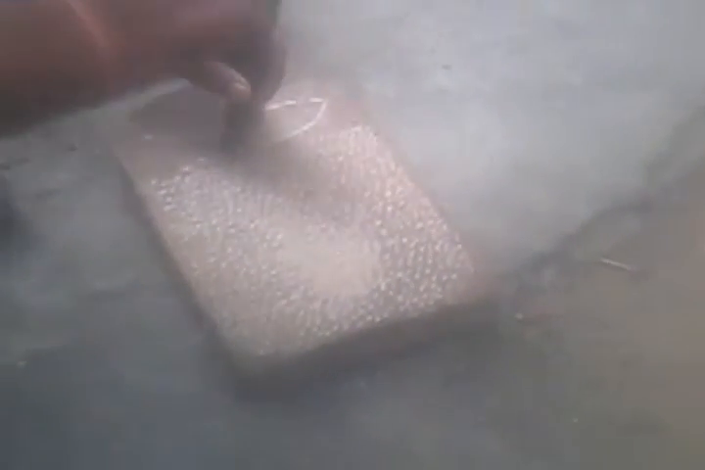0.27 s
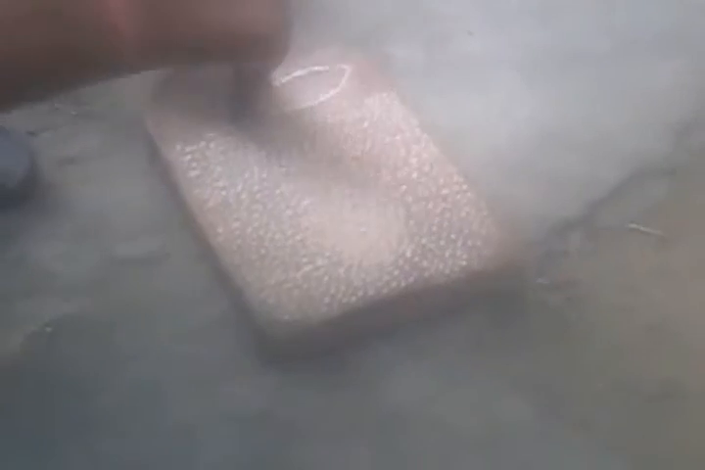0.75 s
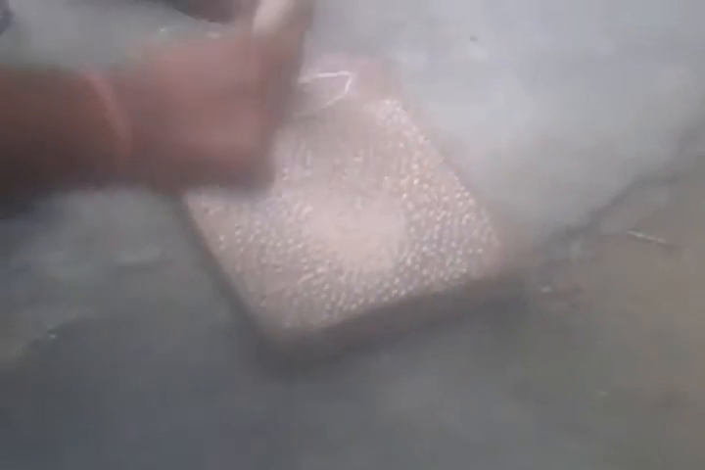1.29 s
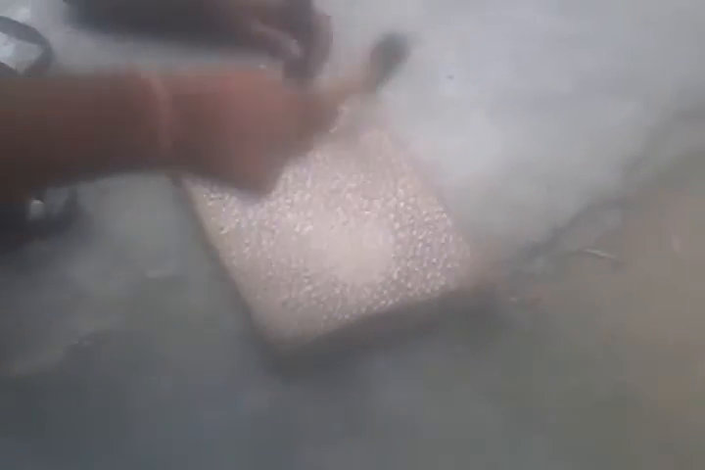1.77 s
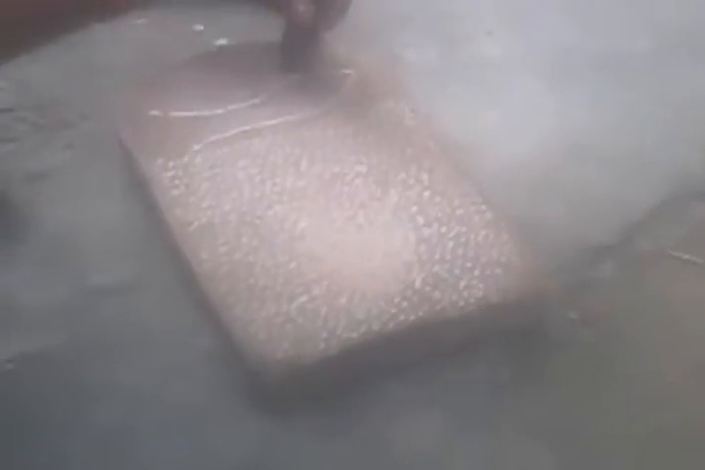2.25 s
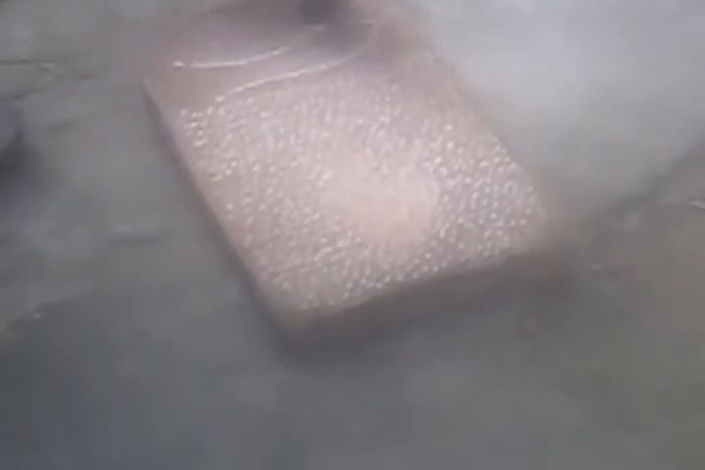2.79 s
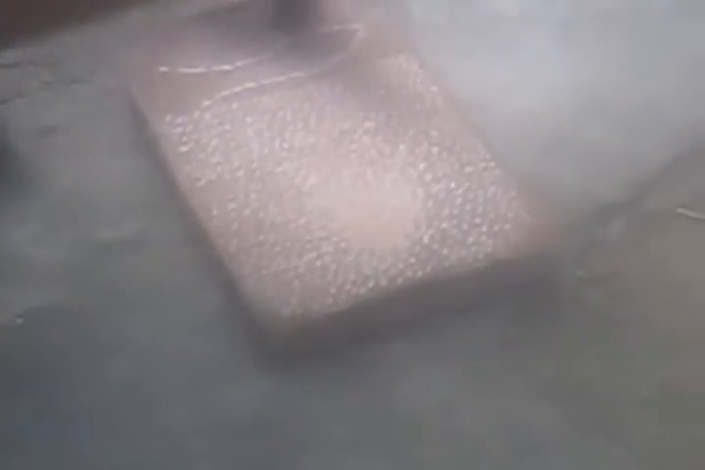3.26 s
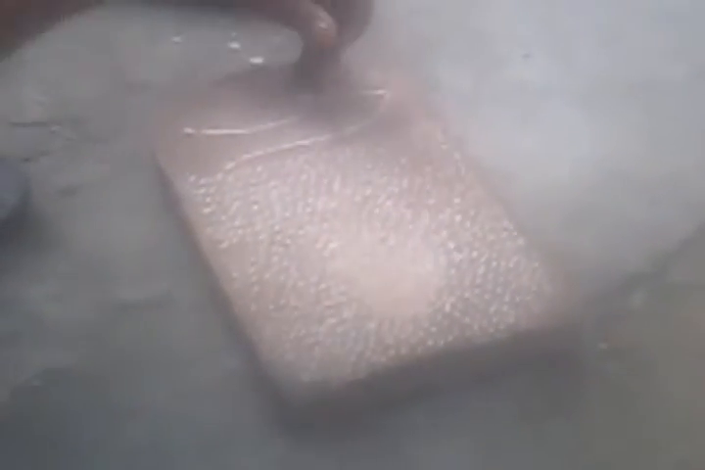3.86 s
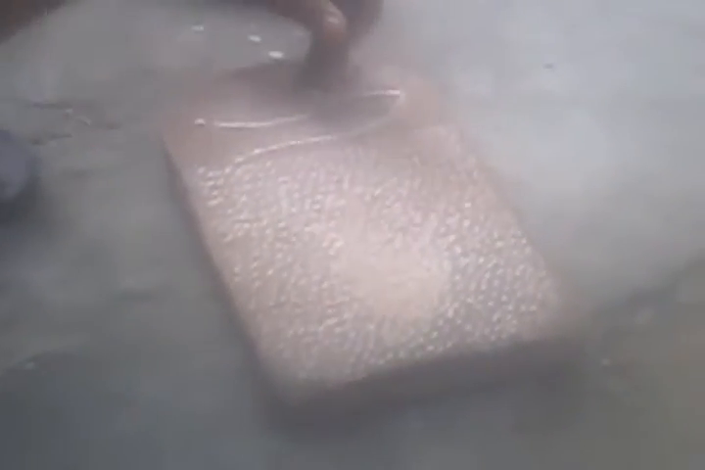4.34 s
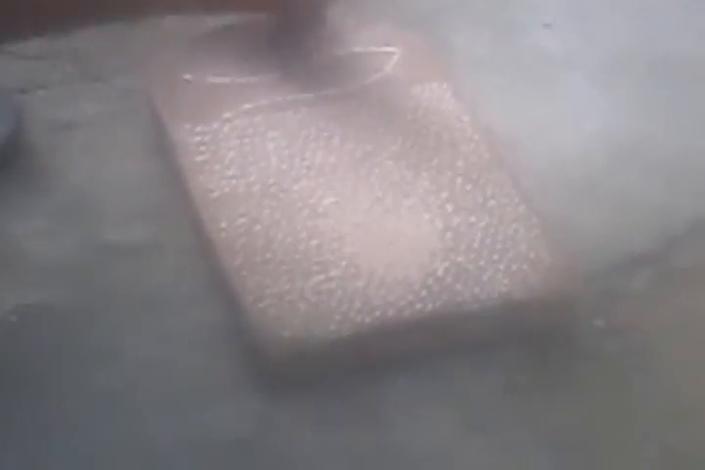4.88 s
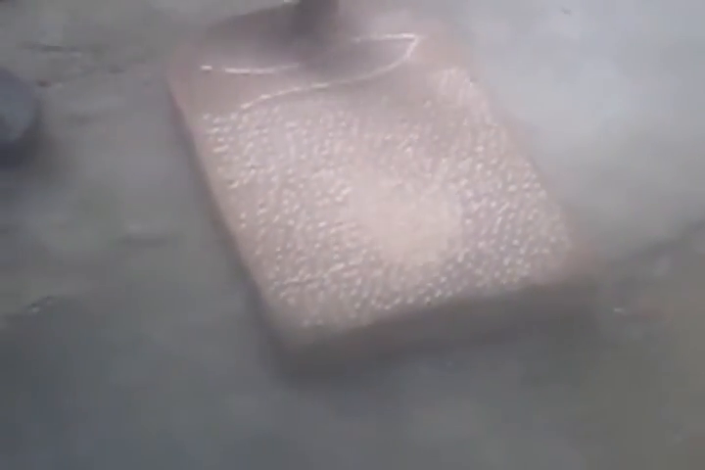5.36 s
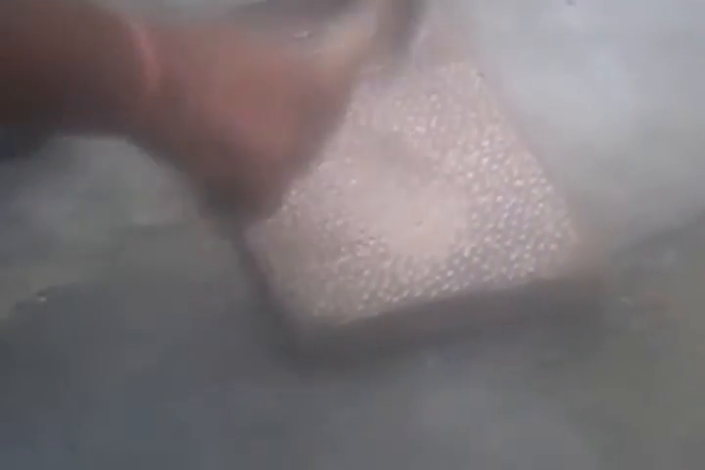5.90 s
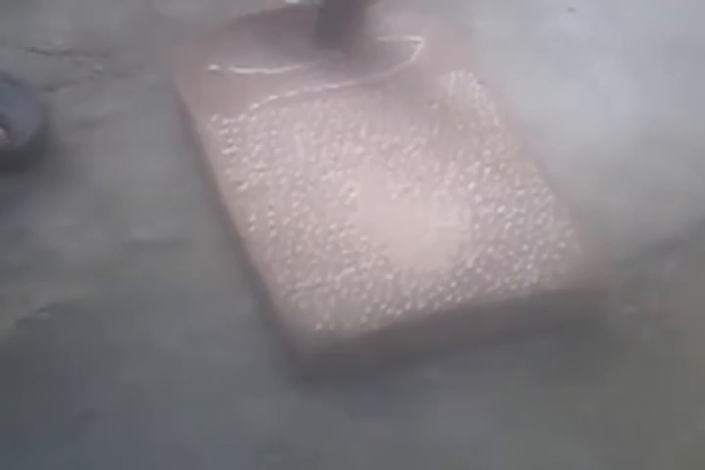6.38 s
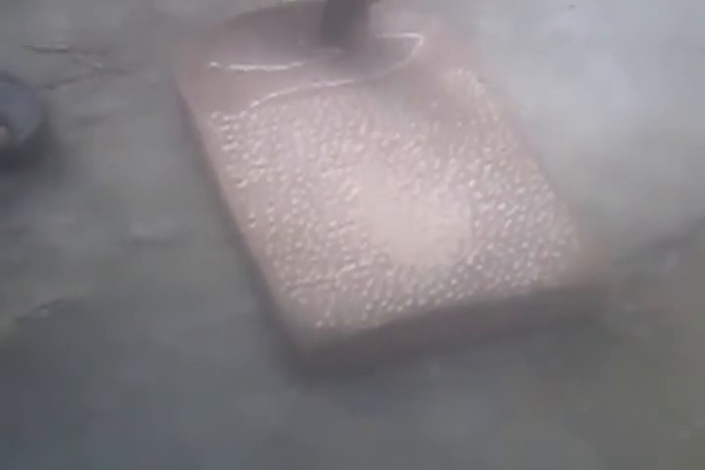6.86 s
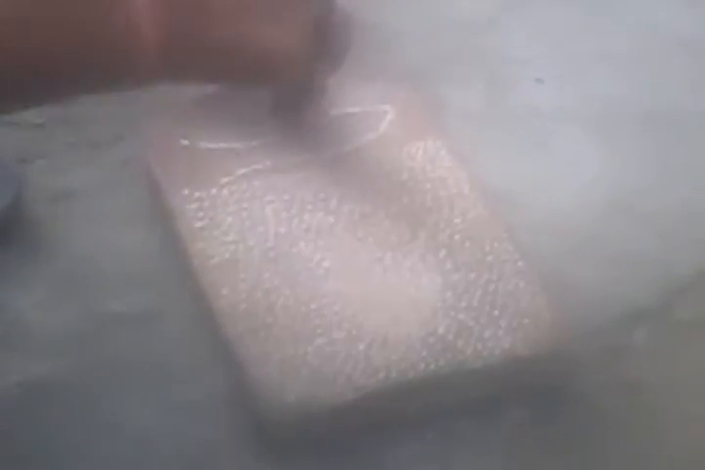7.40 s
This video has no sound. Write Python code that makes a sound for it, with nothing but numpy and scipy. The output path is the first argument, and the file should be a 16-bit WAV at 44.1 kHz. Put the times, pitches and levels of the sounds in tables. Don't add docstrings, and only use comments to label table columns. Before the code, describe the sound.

A small hammer taps a steel chisel on a stone slab, very close to a phone in an outdoor yard. Over faint, uneven hiss, the dying tail of an earlier blow opens the scene. Lighter, clinking blows fall at 0.2 and 0.6 seconds, then a hard one at 0.9 skids, bouncing two or three times in weakening clicks. A woody set-down knock follows at 1.26. From 1.7 the blows run evenly, about every 0.4 seconds, through 5.1, each a dry crack with slab thud, short steel ping and gritty crumbs; those near 3.2 and 3.6 are softer, with small tool knocks at 2.6 and 3.55. At 5.5 the chisel skids and chatters again, set down softly at 5.7. Four more blows land at 6.1, 6.5, 6.9 and 7.3. Peaks distort; after each, gated echo and low street rumble bloom and shut off.

```python
import sys
import numpy as np
from scipy import signal
from scipy.fft import irfft, next_fast_len
from scipy.io import wavfile
from scipy.ndimage import uniform_filter1d

SR = 44100
rng = np.random.default_rng(int(sys.argv[2]) if len(sys.argv) > 2 else 0)


def level_to_linear(level):
    exponent = np.asarray(level, float) / 20
    return 10 ** exponent


def store_pcm(level_fs):
    pcm = np.round(np.clip(level_fs, -1, 1) * 32767).astype(np.int16)
    wavfile.write(sys.argv[1], SR, np.atleast_2d(pcm).T)


N = 336924
FREQS = np.fft.rfftfreq(2 * next_fast_len(N // 2 + 1, real=True), 1 / SR)

# pitch_hz, level_db per Hz
FLOOR = [(60, -16), (565, -12.5), (625, -1.5), (720, -29), (1120, -2.5), (5650, -28), (7500, -26),
         (9750, -51)]
FLOOR_DB = -71.5

# start_s, stays_open_times, opens_by_db, slab_echo_db, hammer_ring_db
TAILS = [(-0.16, 1.74, 0.5, -87, -69), (0.223, 0.96, -1.1, -45, -74.5), (0.582, 0.79, 2, -48, -66),
         (0.926, 1.58, 0.5, -29.5, -73.5), (1.258, 0.42, -44.5, -42.5, -95), (1.679, 0.83, -8.5, -36, -52),
         (2.056, 0.87, -3, -33, -57.5), (2.448, 1.04, -2.6, -32.5, -55.5), (2.841, 0.91, 1, -36.5, -68.5),
         (3.23, 0.88, 1.5, -42.5, -62.5), (3.617, 1.005, 2, -37, -56), (4.006, 1.18, -4, -30, -57),
         (4.393, 0.96, -4, -34, -62), (4.774, 0.91, 1.5, -36.5, -69), (5.147, .97, 3, -34.5, -61.5),
         (5.476, 1.04, 6.5, -32, -76.5), (5.734, 0.36, -41, -54.5, -95), (6.14, 1.05, -2.5, -39.5, -50),
         (6.529, 1.09, 6, -34.5, -43), (6.922, 1.06, -10, -39, -51), (7.32, 0.93, 1.5, -39, -59)]
SKIDS = [3, 15]
# from_s, chisel_pitch_hz, dull_stone_echo_db, shank_ring_db
SEATS = [(0, 2747, 1.5, -62), (.4, 2710, -1, -66), (1.15, 2760, 8, -52.5), (1.9, 2780, 8, -60.5),
         (2.3, 2677, 7, -63.5), (2.7, 2776, -1, -68), (3.0, 2776, -5.5, -56), (3.8, 2808, 3.5, -72.5),
         (4.2, 2773, -7, -68), (5.0, 2950, -7.5, -53), (5.3, 3350, -3, -49.5), (6.7, 2832, -6, -67.5),
         (7.1, 2480, -8, -59.5)]

# pitch_hz, width_hz, level_db, t60_s (time to fall 60 dB), gate_shuts_after_s, gate_drop_db
RUMBLE = [(108.5, 12, -16, 0.83, 0.3, -19.5), (144.4, 35, -8, 5.3, 0.25, -16),
          (214.4, 60, -3.5, 2.8, 0.27, -15), (384, 320, -9, 1.5, 0.22, -12.5),
          (560, 220, -11.5, 3, 0.23, -18.5), (885.6, 120, -9, 8.1, 0.14, -15)]
HAMMER_TAIL = [(4692, 40, 3, .55, .19, -19)]
AIR = [(7280, 34, 1.5, 0.79, 0.33, -12), (8500, 200, -4.5, .4, 0.22, -16.5),
       (8700, 140, 0, 0.36, 0.18, -18.5)]
SLAB_ECHO = [(1062, 95, -5.5, 3.9, 0.18, -16), (1164, 48, -3, 0.43, 0.17, -13.5),
             (1330, 1500, -17, 0.29, 0.028, 0.5)]
SKID_ECHO = [(1154, 57, -2.5, 0.71, 0.19, -6), (1050, 98, -11, 0.99, 0.18, -6.5),
             (1404, 58, -12.5, 0.36, .2, -11), (600, 85, -21.5, 0.82, 0.25, -11.5)]
SHANK = [(3340, 55, -2.4, 0.37, 0.27, -11)]
PATCH = [(5510, 300, 0.48, 0.32, 0.32, -8.5)]
WASH = [(1682, 300, -7, 0.8, 0.14, -5), (2047, 250, -7, 1, 0.2, -9), (2690, 210, -9, 0.56, 0.19, -6),
        (2853, 92, -12.5, 0.98, 0.17, -13), (3230, 1800, -12, 0.34, 0.045, -1),
        (4112, 520, -17.5, 0.77, 0.63, -7.5), (4270, 300, -17, 0.24, 0.34, -6)]
HISS = [(5050, 480, -12, 0.48, 0.26, -6), (5980, 1300, -14, 0.94, 0.45, -10),
        (6320, 350, -7, 0.27, 0.41, -4), (7030, 260, -10.5, 0.94, .14, -9.5)]
SKID_WASH = [(1855, 150, -10, 0.9, 0.2, -9.5), (2470, 620, -4, 0.59, 0.21, -4),
             (2760, 260, -6, 0.35, 0.21, -4.5), (3410, 260, -7, 0.87, 0.2525, -14.5),
             (4063, 770, -17, 0.8, 0.099, -4.5)]
SKID_HISS = [(5700, 250, -7, 0.38, .11, -7), (6270, 300, -6, 0.76, 0.074, -10.5)]

# usual_db, db_per_db_of_opening, added_by_skid_db
RUMBLE_LAW = (-43, 0.33, -9)
WASH_LAW = (-45, 0.56, 3.7)
HISS_LAW = (-56, 0.74, 3.9)
PATCH_LAW = (-60, 0.51, .1)
AIR_LAW = (-72.5, 1, -35)

# start_s, peak_db, pitch_hz, t60_s, grit_db
KNOCKS = [(0.15, -51, 1482, 0.021, -57.5), (.507, -49, 295, 0.091, -67), (1.257, -34.5, 600, 0.041, -50),
          (1.257, -17.5, 1313, 0.058, -71), (1.262, -27.5, 918, 0.13, -76), (1.511, -56, 442, 0.068, -79.5),
          (1.521, -56, 706, 0.034, -80), (2.638, -23.5, 2235, 0.02, -55), (2.656, -32, 2180, 0.01, -63),
          (3.549, -12, 406, 0.014, -32.5), (3.555, -15.5, 480, 0.011, -29.5),
          (3.553, -31, 2020, 0.034, -59), (3.575, -38.5, 244, 0.041, -71.5), (5.731, -32.5, 560, 0.12, -59),
          (5.732, -35, 1272, 0.12, -61)]
# start_s, crack_db, slab_db, slab_pitch_hz, chisel_db
BLOWS = [(0.2236, -16.5, -16, 1050, -4.5), (0.5803, -18, -21, 991.3, -5), (0.9264, -3.5, -5, 1039, -9),
         (1.6771, -2.5, -4, 1029, -5), (2.0556, -1.5, -9.5, 1067, -16), (2.4464, -2, -4.5, 1044, -7.5),
         (2.8391, -3.5, -6, 1058, -9), (3.2285, -11.5, -16, 1058, -8), (3.6161, -8, -9.5, 1052, -10),
         (4.0035, 0, 0, 1050, -13), (4.3912, -2, -9, 1003, -17), (4.7765, -6, -9, 1015, -10.5),
         (5.1467, -1, -6.5, 1003, -11), (5.4768, -5, -11, 1053, -15), (6.138, -2.5, -10.5, 1011, -12),
         (6.5274, -7.5, -2.5, 1050, -5), (6.9212, 0, -7, 1050, -12.5), (7.3176, -2.5, -11.5, 1050, -9.5)]
# start_s, crack_db, slab_db, slab_pitch_hz,
# chisel_db
BOUNCES = [
    (0.9771, -10, -19, 1067, -17.5),
    (1.0024, -20, -28, 1090, -32),
    (1.0215, -38, -27, 1184, -42),
    (1.257, -41, -16, 1050, -64),
    (5.5266, -12, -23.5, 1090, -16),
    (5.5536, -27, -24.5, 1167, -25.5),
    (5.7327, -50, -30, 1038, -35),
]

# pitch_hz, level_db, t60_s, rise_s
SLAB = [(1180, -9.5, 0.0076, 0.0012), (214, 0, 0.061, 0.0029), (149, -7.5, 0.078, 0.002),
        (523.4, 3.5, 0.029, 0.00073), (735.6, -1, 0.05, 0.0016), (420, -4.5, 0.011, 0.0014),
        (1200, -11.5, 0.15, 0.002)]
CHISEL = [(3278, -8.5, 0.037, 0.0011), (2193, 0.5, 0.022, 0.00019), (1820, -2.5, 0.029, 0.00034),
          (2390, -2.5, 0.0047, 0.0011)]
HAMMER = [(4692, 11, .048, .0008), (4250, -4, .018, .0004), (3800, -5, .018, .0004)]
GRIT = [(5283, 3.5, 0.019, 0.0027), (6130, -5.5, 0.024, 0.00067), (6495, -2.5, 0.018, 0.00022),
        (7550, -13, 0.033, 0.00032), (8600, -24, 0.061, .0003)]

START, HOLD, OPEN_DB, ECHO_DB, RING_DB = np.transpose(TAILS)
SKID = np.isin(np.arange(len(START)), SKIDS)
ALL_TAILS = slice(None)


def noise(shape):
    used = shape > 1e-5 * shape.max()
    bins = np.zeros(len(FREQS), np.complex64)
    bins[used] = shape[used] * np.exp(2j * np.pi * rng.random(used.sum()))
    x = irfft(bins)[:N]
    return x / np.std(x)


def smooth(shape, hz):
    lowpass = signal.butter(N=3, Wn=hz, fs=SR, output="sos")
    return signal.sosfilt(lowpass, rng.standard_normal(shape)) * np.sqrt(SR / 2 / hz)


def walk(rate, sr=SR):
    hold, length = int(sr / rate), -(-N * sr // SR)
    steps = np.repeat(rng.standard_normal(length // hold + 1), hold)
    return uniform_filter1d(steps, hold)[:length]


def add(out, start_s, x):
    i = int(start_s * SR)
    out[i:i + len(x)] += x[:N - i]


def seat(s):
    since, *state = np.transpose(SEATS)
    return np.array(state)[:, np.searchsorted(since, s, side="right") - 1]


def ring(modes, t, scatter_db=2.5, detune=0.0044, rough=0.74, soft=1):
    hz, db, t60, rise = np.transpose(modes)[:, :, None]
    luck = rng.standard_normal((3, len(modes), 1))
    crumble = 1 + rough * smooth((len(modes), len(t)), 450)
    swell = (1 - np.exp(-t / (rise * soft))) * level_to_linear(db + scatter_db * luck[0] - 60 * t / t60)
    tones = np.sin(2 * np.pi * hz * (1 + detune * luck[1]) * t + luck[2])
    return np.sum(crumble * swell * tones, axis=0)


def echo(bands, level_db, rows, hold=HOLD, flutter_db=3.0, patchy_db=-1.0, wall_db=2.0, pure=0, rise_s=0.0026):
    start, level_db, hold = START[rows], level_db[rows], hold[rows]
    out, samples = np.zeros(N), np.arange(N) / SR
    t = np.arange(0, N / SR, 1 / 500)
    age = np.clip(t - start[:, None], 0, None)
    wall = wall_db * np.exp(-((age - 0.115) / 0.021) ** 2)
    for hz, width, db, t60, shut, shut_db in bands:
        patch, late = rng.standard_normal((len(start), 2, 1)).transpose(1, 0, 2)
        since = age - shut * hold[:, None] * (1 + 0.12 * late)
        gate_db = shut_db / (1 + np.exp(-since / 0.0028)) - 40 * np.clip(since, 0, None)
        fade_db = level_db[:, None] + db + patchy_db * patch - 60 * (age - 0.09) / t60
        power = (1 - np.exp(-age / rise_s)) * level_to_linear(fade_db + wall + gate_db) ** 2
        band = noise(np.exp(-((FREQS - hz) / width) ** 2))
        if pure:
            tone = np.sqrt(2) * np.sin(2 * np.pi * hz * samples)
            band = (1 - pure) * band + pure * tone
        flutter = level_to_linear(flutter_db * walk(25, sr=500)[:len(t)])
        out += np.interp(samples, t, np.sqrt(power.sum(axis=0)) * flutter) * band
    return out


def tail_db(law):
    usual, slope, skidded = law
    return usual + slope * OPEN_DB + skidded * SKID


def background():
    hz, db = np.transpose(FLOOR)
    shape_db = np.interp(np.log(FREQS + 1), np.log(hz), db, right=-90)
    return noise(level_to_linear(shape_db)) * level_to_linear(FLOOR_DB + 2.3 * walk(40))


def street_rumble():
    hold = 0.92 * np.minimum(HOLD, 1.08)
    return echo(RUMBLE, tail_db(RUMBLE_LAW), ALL_TAILS, hold, flutter_db=3.5, patchy_db=-0.5)


def hammer_tail():
    hold = np.clip(1.36 + 0.08 * (RING_DB + 49.0), 0.8, 2)
    return echo(HAMMER_TAIL, RING_DB, ALL_TAILS, hold, flutter_db=1.5, pure=0.5)


def slab_tail():
    air_db = tail_db(AIR_LAW) - 40 * (ECHO_DB > -32.2)
    out = echo(AIR, air_db, ALL_TAILS, patchy_db=1)
    out += echo(SLAB_ECHO, ECHO_DB, ~SKID, flutter_db=1.5, patchy_db=2.6, wall_db=4.0, rise_s=0.023)
    return out + echo(SKID_ECHO, ECHO_DB, SKID, flutter_db=1.5, patchy_db=-1.5, wall_db=1.5)


def shank_tail():
    shank_db = seat(np.abs(START))[2] + np.minimum(OPEN_DB + 9, 0)
    out = np.zeros(N)
    for bands, level_db in (SHANK, shank_db), (PATCH, tail_db(PATCH_LAW)):
        out += echo(bands, level_db, ~SKID, flutter_db=0.86, patchy_db=-1.5, wall_db=7)
    return out


def yard_wash():
    wash_db, hiss_db = tail_db(WASH_LAW), tail_db(HISS_LAW)
    dull_db = seat(np.abs(START))[1]
    layers = [(WASH[:2], wash_db + dull_db, ~SKID), (WASH[2:], wash_db, ~SKID), (HISS, hiss_db, ~SKID),
              (SKID_WASH, wash_db, SKID), (SKID_HISS, hiss_db, SKID)]
    out = np.zeros(N)
    for bands, level_db, rows in layers:
        out += echo(bands, level_db, rows, np.minimum(HOLD, 1.15), patchy_db=3.3)
    return out


def knocks():
    out, t = np.zeros(N), np.arange(SR // 8) / SR
    for start_s, db, hz, t60, grit_db in KNOCKS:
        pair = [(hz, db, t60, 0.001), (1.4 * hz, db - 14.5, t60, 0.001)]
        body = ring(pair, t, scatter_db=-0.5)
        add(out, start_s, body + level_to_linear(grit_db) * ring(GRIT[1:], t, detune=0.056, rough=0.87))
    return out


def stone(t, crack_db, slab_db, slab_hz, ring_db, light, soft):
    t60 = 0.037 if light else 0.036 - 0.0009 * (slab_db + 12.5)
    thud_db = -42 if light else -25 - 0.21 * (ring_db + 60)
    sweep_hz = slab_hz + 2300 * np.exp(-t / 0.00066)
    crack = level_to_linear(crack_db - 1.0 - 60 * t / 0.0057)
    body = (1 - np.exp(-t / 0.006)) * level_to_linear(slab_db + 16.5 - 60 * t / t60)
    swell = (1 - np.exp(-t / (0.0001 * soft))) * (crack + body)
    return swell * np.sin(2 * np.pi * np.cumsum(sweep_hz) / SR) + level_to_linear(thud_db) * ring(SLAB, t)


def steel(t, start_s, chisel_db, ring_db, rattle, soft):
    chisel_hz = 3350 if rattle else seat(start_s)[0]
    hammer_db = -57 if rattle else max(-15 - 0.01 * (ring_db + 45) ** 2, -46)
    grip_db_per_s = 60 * np.clip(-2.4 * (hammer_db + 12), 0, 40)
    modes = [(chisel_hz, 6.5, 0.017, 0.0004)] + CHISEL
    chisel = level_to_linear(chisel_db - 3.5) * ring(modes, t, rough=1.0, soft=soft)
    head = ring(HAMMER, t, scatter_db=0.5, detune=0.001, rough=0.08)
    return chisel + level_to_linear(hammer_db - grip_db_per_s * t) * head


def crumbs(t, crack_db, chisel_db, light, rattle, soft):
    grit_db = -12 + 0.95 * chisel_db if light else -8.5 + 0.55 * chisel_db
    grit_hz = 6050 if rattle else 5455
    rubble = level_to_linear(crack_db - 16.5 - 60 * t / 0.07) * (1 - np.exp(-t / 0.0024)) * smooth(len(t), 2600)
    modes = [(grit_hz, 3, 0.014, 0.0003)] + (GRIT[:3] if light else GRIT)
    grit = ring(modes, t, detune=0.027, rough=0.63, soft=soft)
    dust = level_to_linear(-18 - 14 * light - 60 * t / 0.021) * np.diff(rng.standard_normal(len(t) + 1))
    return rubble + level_to_linear(grit_db) * (grit + dust)


def blows():
    out, t = np.zeros(N), np.arange(SR // 8) / SR
    for row in sorted(BLOWS + BOUNCES):
        start_s, crack_db, slab_db, slab_hz, chisel_db = row
        tail = np.argmin(np.abs(START - start_s))
        light = row in BOUNCES
        rattle = start_s - START[tail] > 1 / 50
        soft = level_to_linear(-0.28 * crack_db)
        hit = stone(t, crack_db, slab_db, slab_hz, RING_DB[tail], light, soft)
        hit += steel(t, start_s, chisel_db, RING_DB[tail], rattle, soft)
        add(out, start_s, hit + crumbs(t, crack_db, chisel_db, light, rattle, soft))
    return out


def scene():
    tails = street_rumble() + hammer_tail() + slab_tail() + shank_tail() + yard_wash()
    return np.tile(background() + tails + knocks() + blows(), (2, 1))


def roll_off(x):
    return signal.sosfilt(signal.butter(12, 16410, fs=SR, output="sos"), x)


def record(dry):
    lowpass = signal.butter(N=8, Wn=7900, fs=SR, output="sos")
    highpass = signal.butter(N=2, Wn=70, btype="high", fs=SR, output="sos")
    dull = signal.sosfilt(np.vstack([lowpass, highpass]), dry[0])
    ahead = np.linspace(0, 1, SR // 90) ** 0.97 * rng.standard_normal(SR // 90)
    dull += level_to_linear(-56.0) * signal.oaconvolve(dull, ahead)[len(ahead) - 1:]
    knee = 12.0
    mid = np.clip(1.092 * dull / (1 + np.abs(dull) ** knee) ** (1 / knee), -1, 1)
    treble = signal.sosfilt(signal.butter(N=3, Wn=7000, btype="high", fs=SR, output="sos"), mid)
    side = level_to_linear(-24.0 + 7 * walk(25)) * treble * smooth(N, 1500)
    return roll_off(np.array([mid + side, mid - side]))


dry = scene()
out = record(dry)
store_pcm(out)
```